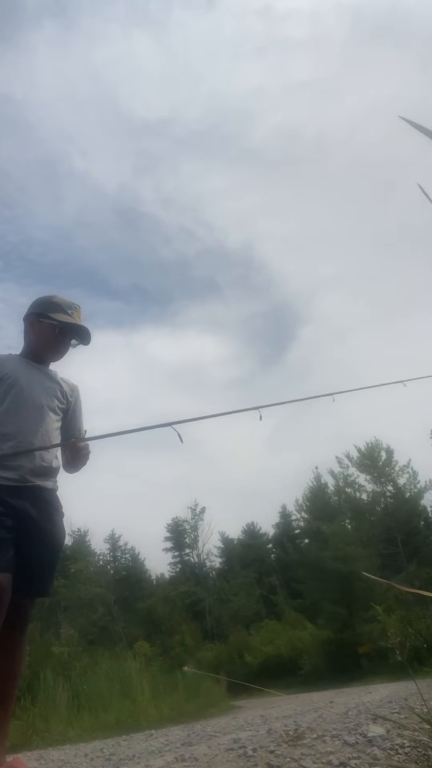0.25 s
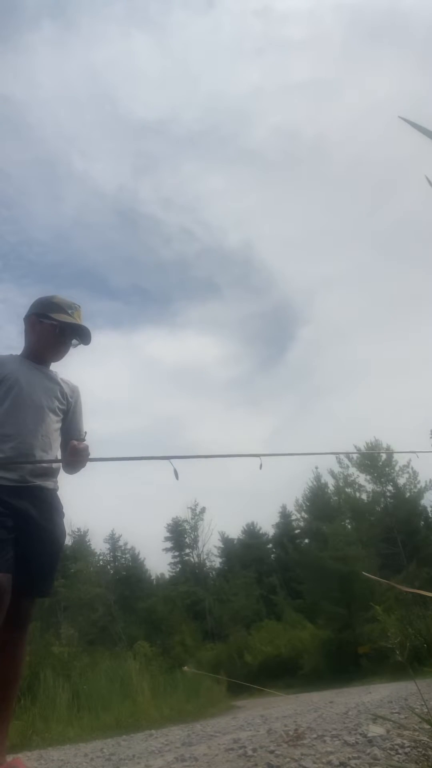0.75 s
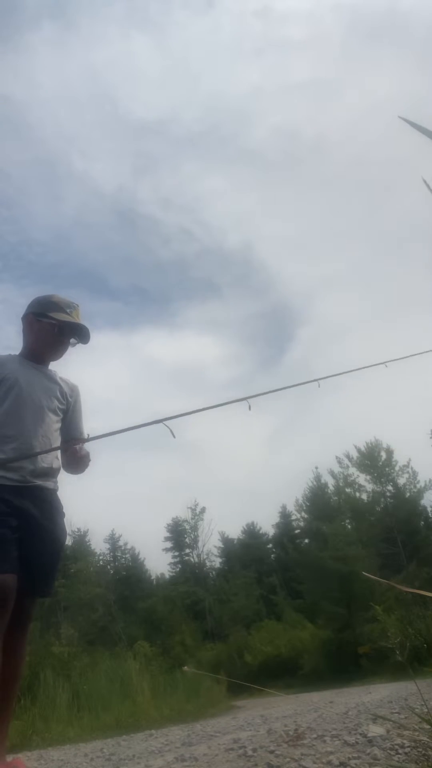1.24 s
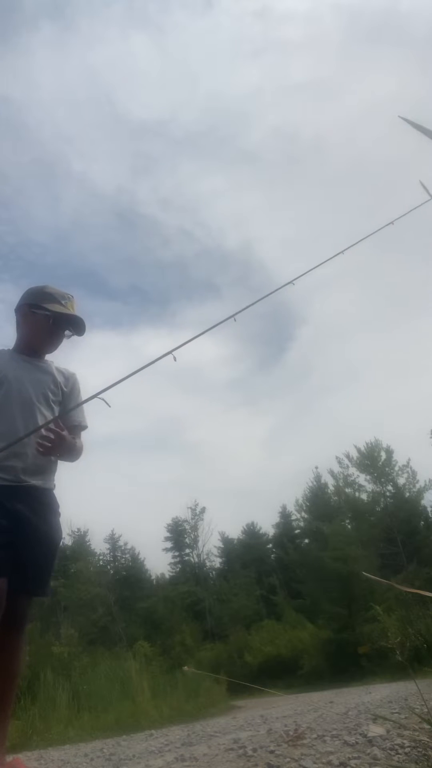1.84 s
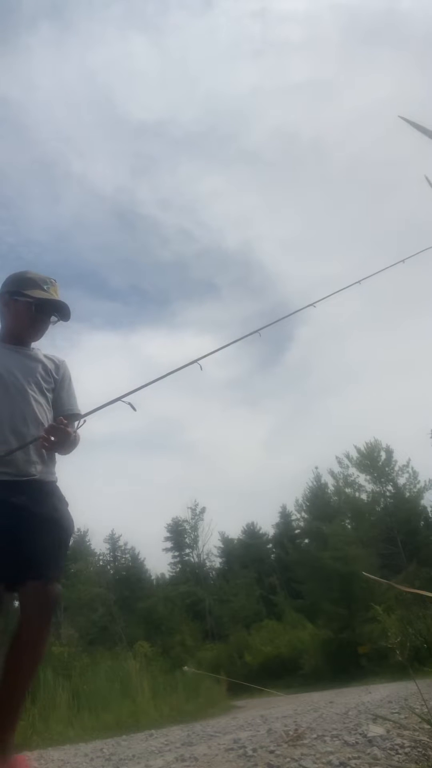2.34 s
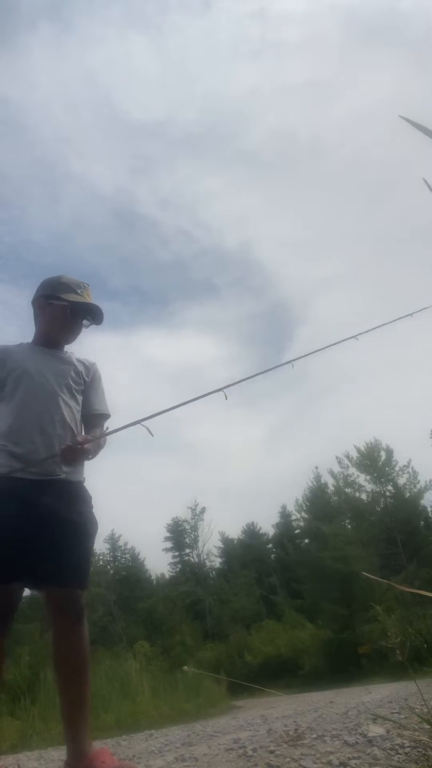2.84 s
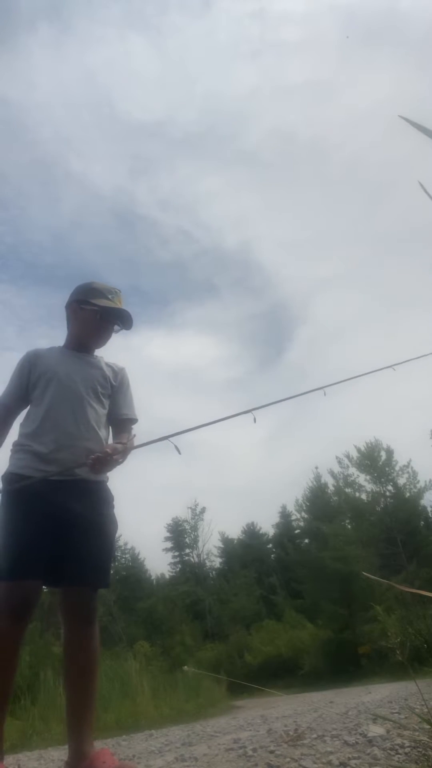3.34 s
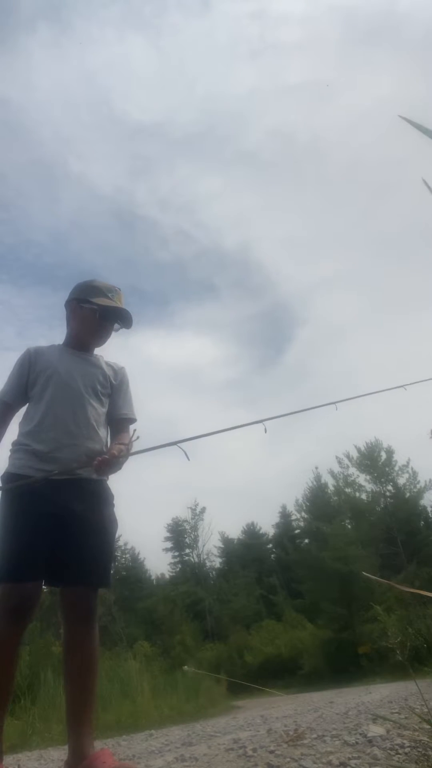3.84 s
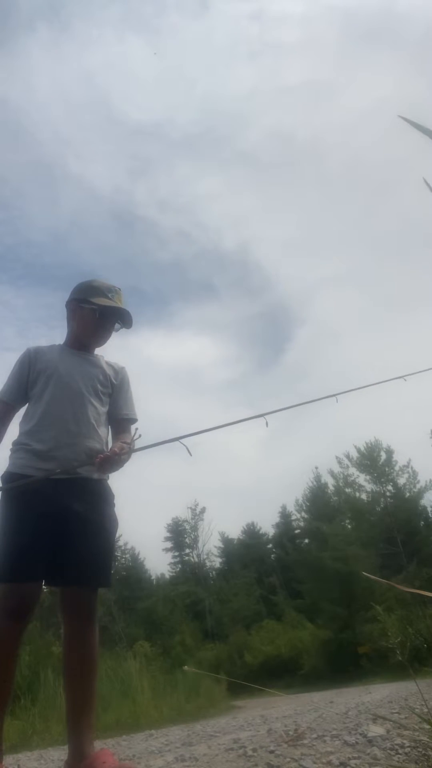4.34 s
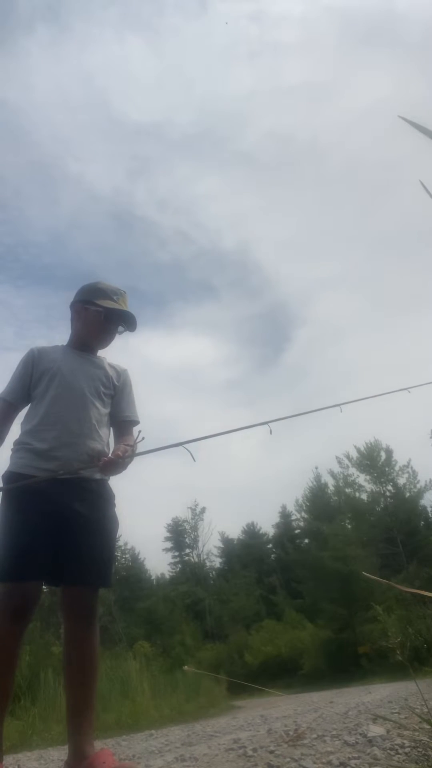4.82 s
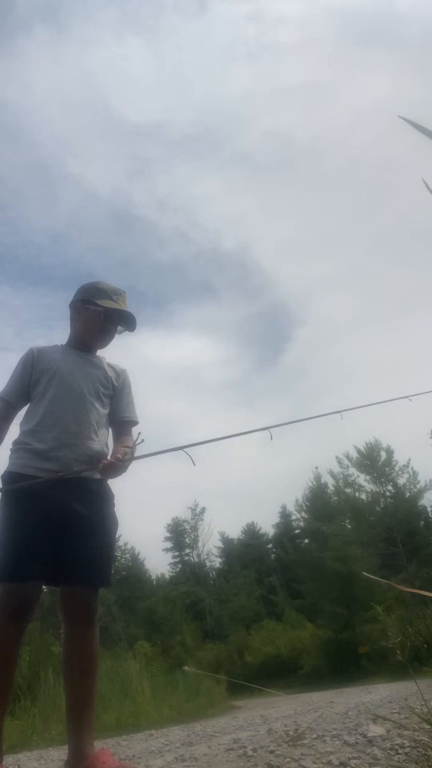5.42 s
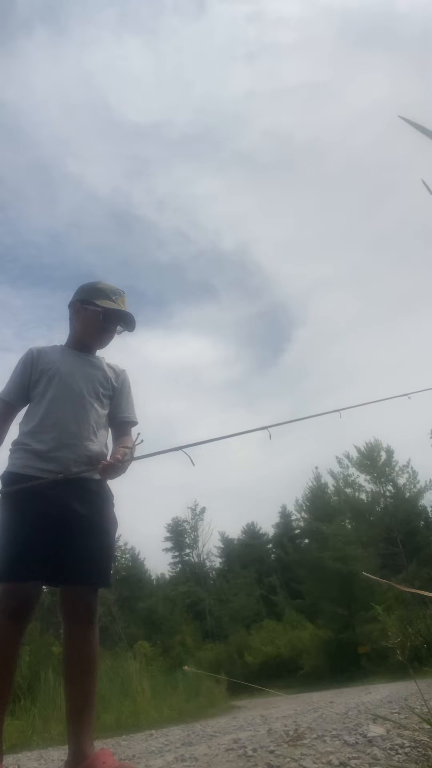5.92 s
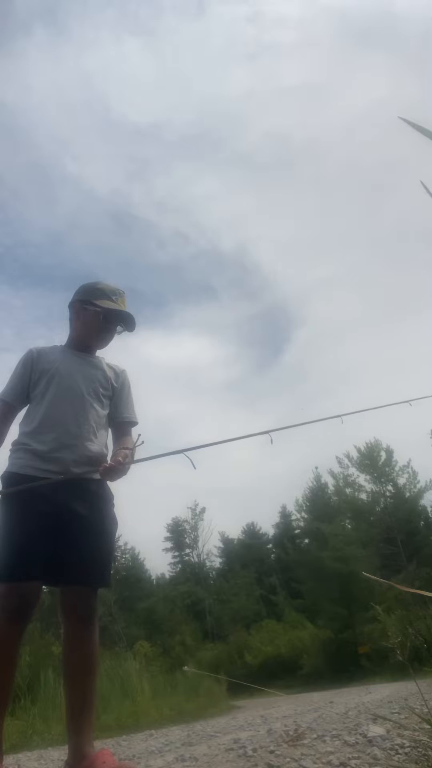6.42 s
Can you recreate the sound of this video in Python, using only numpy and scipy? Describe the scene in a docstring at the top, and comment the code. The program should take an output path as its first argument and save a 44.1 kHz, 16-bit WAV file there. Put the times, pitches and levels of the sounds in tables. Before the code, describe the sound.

A big engine's low throbbing drone revs up beyond the trees, dips in pitch at a gear change, then grows steadily until it passes nearest late on, over a slower chug and soft tyre roar. Close to the microphone, a reel bail snaps in a rapid metallic clatter around two seconds, followed by gravel scuffs and stone clicks. A frog plunks occasionally; a bird slurs down, then others chip and whistle. Open air, stereo, no speech.

```python
"""From the start an eight-cylinder engine revs and a slower one chugs: sums of exhaust orders, over
shaped noise for rumble, road, air and hiss, noisy hums and sine-burst ticks. A frog plunks now and then,
a short two-tone ring; chirps glide. During a gear change come knocks and a rasp of buzzing noise, and a
reel's bail starts snapping: noise cracks and ringing modes. Gravel grinds and clicks, as noise grains and
bursts. Birds slur, chip and whistle as gliding sines, and the big engine passes nearest."""
import sys
import numpy as np
from scipy import signal
from scipy.fft import rfft, irfft
from scipy.io import wavfile
from scipy.ndimage import uniform_filter1d, map_coordinates

SR = 44100
rng = np.random.default_rng(int(sys.argv[2]) if len(sys.argv) > 2 else 0)


def master_out(mix):
    """Clip the mix to full scale and print it as 16-bit PCM to the path in sys.argv[1]."""
    frames = np.transpose(np.atleast_2d(mix))
    ceiling = np.clip(frames, -1, 1)
    pcm = np.round(ceiling * 32767).astype(np.int16)
    wavfile.write(sys.argv[1], SR, pcm)


N = 294147
T = np.arange(N) / SR

# Noise spectra, relative density: pitch_hz, level_db
AIR_SPECTRUM = [(20, -30), (45, -9), (110, 6), (200, -7), (350, -1), (480, -6.5), (560, -10), (700, -9.5),
                (1100, -28.5), (1900, -44), (2350, -39.5), (3200, -40.5), (4200, -42), (5100, -43),
                (7800, -48), (12000, -55)]
HISS_SPECTRUM = [(1500, -39.5), (2050, -8), (2300, 0), (2600, -12), (3300, -28), (4200, -5.5),
                 (4900, -36.5)]
ROAR_SPECTRUM = [(100, -10), (350, 8), (530, -4), (660, -3), (880, 4.5), (1150, -7.5), (1350, -8.5),
                 (1650, -7), (2000, -19), (2400, -22.5), (3200, -40), (6000, -64)]
RUMBLE_SPECTRUM = [(20, -40.5), (32, -18), (42, -3), (60, -6.5), (93, 7), (115, -0.5), (140, -9),
                   (200, -20.5), (400, -32), (800, -71)]
GRAVEL_SPECTRUM = [(300, -5), (700, -1.5), (1400, 13), (1800, -3), (2200, 10), (3200, -14.5), (4200, -2),
                   (5500, -20.5), (8000, -8.5), (12000, -27)]
CRACK_SPECTRUM = [(200, -23), (900, -7.5), (2400, -5), (3300, -8), (4100, 2), (4900, -12), (6500, 2.5),
                  (8200, -4.5), (10000, -8.5), (11800, -16.5), (13000, -42)]
# Far sound, likeness of the two channels (used within 0-1): pitch_hz, likeness
LIKENESS = [(130, 1), (350, .96), (510, 0.15), (640, 1.1), (920, 0.3), (1120, 1.5), (1750, -0.06),
            (2200, 0.38), (3500, 0.13), (7500, 1.03), (11000, 0.9)]
# Far sound, phase lead of the right channel: pitch_hz, lead_rad
RIGHT_LEAD = [(220, 0), (330, -0.07), (470, -.2), (550, 1.33), (900, 1.8), (1050, 1.5), (1600, 0.53),
              (1900, 1.87), (2600, 1.9), (3300, 3.5), (4200, 4), (7000, 0.8), (12000, 2)]
# Far sound, left level over right: pitch_hz, level_db
LEFT_OVER_RIGHT = [(170, 0.2), (350, -1.5), (475, -6.5), (760, 6), (950, 3), (1200, -0.5), (1600, 2),
                   (2600, 0)]
# Hums from the far road, octave_db relative: start_s, length_s, pitch_hz, width_hz, level_db,
# octave_db, clean_share (0-1)
HUMS = [(-.5, 1.23, 341, 39, -59.5, -0.5, 0.07), (0.545, 0.49, 331, 34, -56, -14, 0),
        (1.562, 0.77, 319.7, 16, -57, -14.5, 0.32), (2.101, 1.01, 319.6, 7.4, -55.5, -11, 0.7),
        (5.852, 0.9, 285.4, 57, -53.5, -17, .1)]
# Runs of faint ticks: start_s, length_s
STUTTERS = [(.8, .04), (0.962, .06), (1.39, .1), (2.51, .06), (2.935, .04), (3.765, .06), (4.163, .085),
            (5.954, .06), (6.352, .06)]
# Drooping chirps deep in the wood: start_s, length_s, level_db, roughness (0-1)
CHIRPS = [(1.231, 0.25, -82, 0.5), (3.555, 0.069, -85, 0.6), (3.677, 0.075, -75, 0.1)]
# Hooked whistles, level before crest and pan: start_s, length_s, level_db, roughness (0-1),
# last_pitch_hz, glide_s
HOOKS = [(4.826, 0.12, -70.5, 0.75, 5600, 0.03), (4.949, 0.125, -67, .55, 5410, .019),
         (5.081, 0.11, -66, 0.18, 5470, .019)]
# One long falling slur: time_s, pitch_hz, level_db
SLUR = [(3.98, 3250, -88), (4.034, 2850, -60), (4.052, 2770, -71), (4.095, 2550, -55), (4.105, 2470, -59),
        (4.12, 2370, -51), (4.135, 2280, -56), (4.17, 2070, -59), (4.21, 1890, -64.5), (4.24, 1780, -77.5)]
# Chips softening into a twitter: centre_s, pitch_hz, peak_db, half_length_s, glide_octaves_per_s
CHIPS = [(4.823, 5150, -56, .0012, -3), (4.842, 4870, -45, .0011, -12), (4.862, 4980, -44, 0.00099, -9),
         (4.878, 4900, -41.5, .0011, -10.5), (4.897, 4770, -42, 0.00067, -9),
         (4.907, 5530, -58, .002, -4.5), (4.919, 4280, -61, 0.0017, 15), (4.927, 5520, -57.5, 0.0018, -14),
         (4.935, 3400, -70.5, .0015, 0.5), (4.948, 3400, -67, .0015, 2), (4.975, 3450, -66.5, .0015, 2.5),
         (4.94, 4130, -60, .002, -8.5), (4.946, 5170, -52.5, .002, -4), (4.958, 4110, -60.5, 0.003, 5.5),
         (4.9655, 5060, -51.5, 0.0017, -6.5), (4.978, 4360, -56.5, .003, 13.5),
         (4.986, 5370, -54.5, 0.0022, -4), (4.995, 3970, -64.5, 0.0031, 7.5),
         (5.006, 5250, -54.5, .003, -5), (5.014, 4210, -62.5, 0.0026, 16.5)]
# Rasping call, one row per voice: start_s, length_s, pitch_hz, half_width_hz, level_db
RASP = [(1.847, .152, 4100, 334, -65.5), (1.858, .13, 5050, 300, -68.5)]
# Frog plunks, level before envelope and pan: start_s, level_db
PLUNKS = [(.812, -44.5), (2.1422, -30), (3.298, -42.5), (5.765, -36.5)]
# Scuffs on gravel: start_s, length_s, level_db
SCUFFS = [(1.326, 0.24, -77), (2.246, 0.15, -71), (2.648, 0.17, -68.5), (2.764, 0.18, -75),
          (3.135, .05, -74), (3.275, 0.05, -73)]
# Stones clicking together: start_s, level_db, dullness_db_per_octave
STONES = [(2.289, -69.5, 0), (2.322, -70, -8), (2.6713, -61.5, -1), (2.713, -61, -3), (2.761, -62, 5),
          (2.812, -67.5, -6), (2.848, -66.5, -1), (2.9307, -64.5, 2.5), (3.144, -59.5, 6),
          (3.293, -60.5, 6), (3.836, -71.5, -14)]
# Light knocks on the rod: start_s, envelope_peak_db
KNOCKS = [(1.748, -55.5), (1.764, -52), (1.776, -52), (2.289, -47), (2.302, -48.5)]
# Bail strikes: start_s, crack_db, crack_t60_s, dullness_db_per_octave, body_db
BAIL = [(2.0408, -41, 0.029, -5, -43), (2.046, -50, 0.02, 9, -41.5), (2.059, -62, 0.03, 5, -58),
        (2.0732, -46.5, 0.038, 4, -56), (2.0805, -55, 0.028, 6, -48), (2.1096, -43, 0.023, 2, -50),
        (2.1150, -53, 0.035, 8, -42), (2.1275, -44.5, 0.038, 3.5, -65), (2.1422, -44.5, 0.062, 13, -44.5),
        (2.1525, -47, 0.024, 5, -48.5)]
# Modes of reel body and rod, before random detuning: pitch_hz, level_db, t60_s
REEL_MODES = [(650, 0, 0.057), (738, -2.5, 0.05), (1305, -3, 0.02), (1607, -14, 0.045), (2206, -9.5, 0.041),
              (2650, -9, 0.03)]
# Slow engine, its order groups: time_s, lower_orders_db, upper_orders_db
CHUG_LEVELS = [(0, -63, -65), (2.6, -64, -59.5), (3.7, -60.5, -71), (4.3, -56, -51), (5, -57, -55),
               (5.5, -58, -61.5), (6.1, -57.5, -54), (6.67, -54.5, -59.5)]
# Slow engine exhaust, relative: multiple_of_firing_rate, level_db
CHUG_ORDERS = [(2, -14), (3, 1.5), (4, -5.5), (6, -2.5), (7, -7), (9, -1), (10, -3), (11, -9), (12, -14.5),
               (14, -16), (15, -10.5), (16, -0.5), (17, -11.5), (23, -25.5)]
# Big engine exhaust, relative: multiple_of_eight_firing_cycle, level_db
DRONE_ORDERS = [(5, -18.5), (6, -21.5), (7, -22), (8, 1), (9, -17.5), (10, -25.5), (11, -26.5), (12, -31.5),
                (14, -27.5), (15, -31.5), (16, -26.5), (18, -37.5), (21, -42.5), (24, -42), (27, -35)]
# Brief swells and dips of the big engine: centre_s, half_length_s, change_db
SWINGS = [(2.796, 0.12, 2), (5.527, 0.24, 1.5), (3.807, 0.13, -1.5), (5.286, 0.059, -5), (5.942, .08, -3),
          (6.378, 0.14, -5.5)]

ROAR_DB, ROAR_NEAREST_AT_S, ROAR_PASS_S = -60, 5.95, 1.94
RUMBLE_START_DB, RUMBLE_DB_PER_S, RUMBLE_COAST_DB = -51, 1.32, -2.5
CHIRP_FROM_HZ, CHIRP_TO_HZ = 4550, 4300
HOOK_FROM_HZ, HOOK_CREST_DB, LEFT_BIRD_LEAD_MS = 7200, 7, 0.3185
WHISTLE_RISE_S, SLUR_ROUGHNESS = .008, .4
RASP_PER_S, RASP_DEPTH, RASP_RISE_S, RASP_FALL_S = 200, 0.47, 0.04, .015
PLUNK_HZ, PLUNK_FADE_S = 410, 0.015
KNOCK_HZ = 1273
CHUG_START_HZ, CHUG_SAG_HZ_PER_S, FIRST_UPPER_ORDER = 21.06, .168, 14
# Big engine: firing rates, gear change, throttle, pass
START_HZ, TOP_HZ, REV_S, START_DB = 83.22, 109.55, .36, -7.5
SHIFT_AT_S, SHIFT_S, HIGH_GEAR_HZ, GAIN_HZ_PER_S = 1.74, 0.3733, 98.96, 1.95
THROTTLE_AT_S, THROTTLE_S, COAST_DB = 2.22, 0.73, -6
NEAREST_AT_S, PASS_S, NEAREST_DB = 5.59, 2.67, -34
TREETOP_ECHO_T60_S = .26
CUT_HZ = 12300


def amp(db):
    """Amplitude from dB."""
    return 10 ** (np.asarray(db) / 20)


def unit(x):
    """Scales x to rms 1."""
    return x / np.sqrt(np.mean(x ** 2) + 1e-20)


def read(points, hz):
    """Reads a spectrum table on a log frequency scale."""
    f, value = np.transpose(points)
    return np.interp(np.log(hz + 1), np.log(f + 1), value)


def curves(rows):
    """Columns of a table, joined by straight lines over the whole time."""
    s, *columns = np.transpose(rows)
    return [np.interp(T, s, c) for c in columns]


def add(mix, start_s, sound):
    """Adds sound to mix in place, trimmed to fit."""
    start = round(start_s * SR)
    sound = sound[..., max(-start, 0):]
    part = mix[:, max(start, 0):][:, :sound.shape[-1]]
    part += sound[..., :part.shape[1]]


def wander(knots_per_s):
    """Smooth random curve of rms 1, held in steps of 100 samples."""
    knots = rng.standard_normal(400)
    curve = map_coordinates(knots, [T[::100] * knots_per_s], order=3, mode="wrap")
    return unit(curve)[np.arange(N) // 100]


def ease(start_s, length_s):
    """Smooth step from 0 to 1."""
    return np.sin(np.pi / 2 * np.clip((T - start_s) / length_s, 0, 1)) ** 2


def passing(at_s, pass_s):
    """Level in dB of a source moving along the road, 0 where nearest."""
    return -10 * np.log10(1 + ((T - at_s) / pass_s) ** 2)


def colour(x, spectrum, dull_db=0):
    """Filters x by a spectrum, tilted down dull_db per octave above 1 kHz, to rms 1."""
    hz = np.fft.rfftfreq(x.shape[-1], 1 / SR)
    gain_db = read(spectrum, hz) - dull_db * np.log2(np.maximum(hz, 1000))
    return unit(irfft(rfft(x) * amp(gain_db), x.shape[-1]))


def diffuse(spectrum):
    """Far noise at two microphones: one in the bass, partly alike and shifted in phase and level above."""
    left, other = rfft(rng.standard_normal((2, N)))
    hz = np.fft.rfftfreq(N, 1 / SR)
    same = np.clip(read(LIKENESS, hz), 0, 1)
    tilt = amp(read(LEFT_OVER_RIGHT, hz))
    right = same * left + np.sqrt(1 - same ** 2) * other
    right = right * np.exp(1j * read(RIGHT_LEAD, hz))
    pair = np.array([tilt * left, right]) / np.sqrt(1 + tilt ** 2)
    return colour(irfft(pair, N), spectrum)


def place(x, lead_ms):
    """Sound from one side reaches one microphone first: the left if lead_ms is positive."""
    hz = np.fft.rfftfreq(len(x), 1 / SR)
    delay = np.exp(-2j * np.pi * hz * lead_ms / 1000)
    return np.array([x, irfft(rfft(x) * delay, len(x))])


def forest(x, t60_s=0.14):
    """Trunks and leaves scatter a thin, short echo: sparse decaying random taps."""
    t = T[:SR // 2]
    sparse = rng.standard_normal((2, len(t))) * (rng.random((2, len(t))) < .05)
    taps = sparse * (t > .005) * amp(-60 * t / t60_s)
    return signal.fftconvolve(x, taps / np.linalg.norm(taps[0]), axes=1)[:, :N]


def air(level_db=-52.5):
    """Still air: steady diffuse noise."""
    return amp(level_db) * diffuse(AIR_SPECTRUM)


def hiss(level_db=-87, range_db=3):
    """Thin hiss that comes and goes at random."""
    return amp(level_db + range_db * wander(17)) * diffuse(HISS_SPECTRUM)


def ticks(level_db=-76, pitch_hz=7700, beat_s=.08, stutter_s=0.01):
    """Very faint sine bursts on a steady beat; some are skipped, a few stutter."""
    out, t = np.zeros((2, N)), np.arange(-2 ** 7, 2 ** 7) / SR
    tick = amp(level_db) * np.exp(-(t / .00035) ** 2 / 2) * np.sin(2 * np.pi * pitch_hz * t)
    beats = np.arange(0, T[-1], beat_s)
    times_s = [s for s, chance in zip(beats, rng.random(200)) if chance < .6]
    for start_s, length_s in STUTTERS:
        times_s.extend(np.arange(start_s, start_s + length_s, stutter_s))
    for s in times_s:
        add(out, s, tick)
    return out


def hums(waver_hz=1.5):
    """A hum and its octave swell and pass together, part wavering tone, part narrow noise."""
    out = np.zeros((2, N))
    for start_s, length_s, pitch_hz, width_hz, level_db, octave_db, clean in HUMS:
        size, clean = int(length_s * SR), np.clip(clean, 0, 1)
        turns = np.cumsum(pitch_hz + waver_hz * wander(4)[:size]) / SR
        for k, db in (1, level_db), (2, level_db + octave_db):
            hz = k * pitch_hz
            band = [(hz - 3 * width_hz, -70), (hz - width_hz, -16), (hz, 0),
                    (hz + width_hz, -16), (hz + 3 * width_hz, -70)]
            noise = unit(diffuse(band)[:, :size])
            lead_rad = np.array([[0], [read(RIGHT_LEAD, hz)]])
            tone = unit(np.sin(2 * np.pi * k * turns + lead_rad))
            hum = np.sqrt(clean) * tone + np.sqrt(1 - clean) * noise
            add(out, start_s, amp(db) * hum * signal.windows.tukey(size, .7))
    return out


def road_roar():
    """Tyre roar: flickering noise, loudest where the tyres pass nearest."""
    level_db = ROAR_DB + passing(ROAR_NEAREST_AT_S, ROAR_PASS_S) + 1.9 * wander(7)
    return amp(level_db) * diffuse(ROAR_SPECTRUM) * amp([[.8], [-.8]])


def exhaust_rumble():
    """Exhaust scattered by the forest: noise that grows as engines near, weaker until the throttle opens."""
    coast_db = RUMBLE_COAST_DB * (1 - ease(THROTTLE_AT_S, THROTTLE_S))
    return amp(RUMBLE_START_DB + RUMBLE_DB_PER_S * T + coast_db) * diffuse(RUMBLE_SPECTRUM)


def whistle(length_s, first_hz, last_hz, glide_s, rough, level_db, lead_ms, waver=0.0028, crest_db=0):
    """Down-gliding tone with a late crest; fast random flutter makes it hoarse, most at its start."""
    t = T[:int(length_s * SR)]
    glide_hz = last_hz + (first_hz - last_hz) * np.exp(-t / glide_s)
    hz = glide_hz * (1 + waver * wander(190)[:len(t)])
    crest = crest_db * np.exp(-((t / length_s - 0.66) / 0.19) ** 2)
    onset = 1 - np.exp(-t / WHISTLE_RISE_S)
    level = amp(level_db + crest - 3 * wander(70)[:len(t)]) * onset * np.sqrt(np.sin(np.pi * t / length_s))
    share = np.clip(rough * (1.5 - t / length_s), 0, 1)
    hoarse = unit(1 - share + share * wander(600)[:len(t)])
    tone = np.sin(2 * np.pi * np.cumsum(hz) / SR)
    return place(level * uniform_filter1d(hoarse, size=50) * tone, lead_ms)


def chirps():
    """Faint, slightly drooping whistles ahead."""
    out = np.zeros((2, N))
    for start_s, length_s, level_db, rough in CHIRPS:
        add(out, start_s, whistle(length_s, CHIRP_FROM_HZ, CHIRP_TO_HZ, glide_s=0.086, rough=rough,
                                  level_db=level_db, lead_ms=0, waver=0.019))
    return out


def hooks():
    """High whistles on the left: each drops fast, levels out and then crests."""
    out = np.zeros((2, N))
    for start_s, length_s, level_db, rough, last_hz, glide_s in HOOKS:
        hook = whistle(length_s, HOOK_FROM_HZ, last_hz, glide_s, rough, level_db, LEFT_BIRD_LEAD_MS,
                       crest_db=HOOK_CREST_DB)
        add(out, start_s, hook * amp([[1.2], [-1.2]]))
    return out


def slur(lead_ms=-0.12):
    """A bird on the right slides down, its voice shaking in strength and phase."""
    hz, level_db = curves(SLUR)
    singing = (T > SLUR[0][0]) & (T < SLUR[-1][0])
    shake = SLUR_ROUGHNESS * uniform_filter1d(wander(420), size=100)
    jitter_rad = SLUR_ROUGHNESS * uniform_filter1d(wander(420), size=100)
    tone = np.sin(2 * np.pi * np.cumsum(hz) / SR + jitter_rad)
    return place(singing * amp(level_db) * (1 + shake) * tone, lead_ms)


def chips(skirt=.11, skirt_s=.003):
    """Tiny gliding notes on the left, each a clear peak in a ragged skirt."""
    out, t = np.zeros((2, N)), np.arange(-2 ** 10, 2 ** 10) / SR
    for centre_s, hz, peak_db, half_s, glide in CHIPS:
        ragged = unit(uniform_filter1d(rng.standard_normal(len(t)), size=30))
        shape = np.exp(-(t / half_s) ** 2 / 2) + skirt * ragged * np.exp(-(t / skirt_s) ** 2 / 2)
        tone = np.sin(2 * np.pi * np.cumsum(hz * 2 ** (glide * t)) / SR)
        chip = amp(peak_db) * uniform_filter1d(shape, size=12) * tone
        add(out, centre_s + t[0], place(chip, LEFT_BIRD_LEAD_MS))
    return out


def rasp(edge_db=-8, skirt_db=-38):
    """Hoarse buzz in two voices: pulsed band noise that fades in and stops quickly."""
    out = np.zeros((2, N))
    for start_s, length_s, hz, half_hz, level_db in RASP:
        t = T[:int(length_s * SR)]
        band = [(hz - 4 * half_hz, -70), (hz - 2 * half_hz, skirt_db), (hz - half_hz, edge_db), (hz, 0),
                (hz + half_hz, edge_db), (hz + 2 * half_hz, skirt_db), (hz + 4 * half_hz, -70)]
        buzz = 1 + RASP_DEPTH * np.sin(2 * np.pi * RASP_PER_S * t + wander(60)[:len(t)])
        voice = unit(buzz * colour(rng.standard_normal(len(t)), band))
        fades = np.minimum(t / RASP_RISE_S, 1) * np.minimum((length_s - t) / RASP_FALL_S, 1)
        add(out, start_s, place(amp(level_db) * fades * voice, LEFT_BIRD_LEAD_MS))
    return out


def frog(overtone_db=-14, overtone=1.55):
    """One pluck of the throat rings the vocal sac at two pitches."""
    out, t = np.zeros((2, N)), np.arange(2 ** 13) / SR
    sac = np.sin(2 * np.pi * PLUNK_HZ * t)
    sac = sac + amp(overtone_db) * np.sin(2 * np.pi * overtone * PLUNK_HZ * t)
    pluck = sac * t / PLUNK_FADE_S * np.exp(-(t / PLUNK_FADE_S) ** 2 / 2)
    for start_s, level_db in PLUNKS:
        add(out, start_s, amp(level_db) * pluck)
    return out * amp([[-1.5], [1.5]])


def gravel_scuffs(grains_per_s=1100, spread_db=1.5):
    """Small stones grind under a foot: random grains of uneven size."""
    sizes = amp(spread_db * np.minimum(rng.exponential(1, N), 4))
    grains = sizes * (rng.random(N) < grains_per_s / SR)
    grit = colour(grains * rng.standard_normal((2, N)), GRAVEL_SPECTRUM)
    level = np.zeros((2, N))
    for start_s, length_s, level_db in SCUFFS:
        add(level, start_s, amp(level_db) * signal.windows.tukey(int(length_s * SR), .6))
    return level * grit


def stone_clicks(t60_s=0.032):
    """Single stones click together: short decaying noise bursts."""
    out, t = np.zeros((2, N)), np.arange(2 ** 11) / SR
    for start_s, level_db, dull_db in STONES:
        noise = colour(rng.standard_normal((2, len(t))), GRAVEL_SPECTRUM, dull_db)
        add(out, start_s, noise * amp(level_db - 60 * t / t60_s))
    return out


def rod_knocks(fade_s=0.0014):
    """Knocks on the rod: a tone that dies within a few cycles."""
    out, t = np.zeros((2, N)), np.arange(2 ** 13) / SR
    for start_s, peak_db in KNOCKS:
        envelope = amp(peak_db) * t / fade_s * np.exp(1 - t / fade_s)
        add(out, start_s, place(envelope * np.sin(2 * np.pi * KNOCK_HZ * t), lead_ms=-0.11))
    return out


def reel_bail(shared=0.25, rise_s=0.00086, detune=0.042, uneven_db=2):
    """Each bail strike is a short noise crack and rings the reel's modes a little differently."""
    out, t = np.zeros((2, N)), np.arange(2 ** 13) / SR
    for start_s, crack_db, t60_s, dull_db, body_db in BAIL:
        noise = shared * rng.standard_normal(len(t)) + rng.standard_normal((2, len(t)))
        sound = colour(noise, CRACK_SPECTRUM, dull_db) * amp(crack_db - 60 * t / t60_s)
        chances = rng.uniform(-0.9, 1, (len(REEL_MODES), 2))
        for (hz, mode_db, ring_s), (sharp, loud) in zip(REEL_MODES, chances):
            turns = hz * (1 + detune * sharp) * t + rng.random((2, 1)) / 2
            level = amp(body_db + mode_db + uneven_db * loud - 60 * t / ring_s)
            sound = sound + level * np.sin(2 * np.pi * turns)
        add(out, start_s, sound * (1 - np.exp(-t / rise_s)))
    return out


def exhaust(cycle_hz, orders, steady_order, smear_rad, fade_db, drift_rad):
    """Exhaust orders: the pipe smears each beat; moving air makes orders off the steady one fade and drift."""
    turns, out = np.cumsum(cycle_hz) / SR, np.zeros(N)
    for k, level_db in orders:
        away = round(k) - steady_order
        loose = min(abs(away) / 3, 1)
        drift = drift_rad * loose * wander(2.5)
        phase = 2 * np.pi * round(k) * turns + smear_rad * away ** 2 + drift
        out += amp(level_db + fade_db * loose * wander(2.5)) * np.sqrt(2) * np.cos(phase)
    return out


def slow_engine():
    """Chug that sags in rate; lower orders grow as it nears, upper orders swell and fade."""
    lower_db, upper_db = curves(CHUG_LEVELS)
    orders = []
    for k, db in CHUG_ORDERS:
        group_db = upper_db if round(k) >= FIRST_UPPER_ORDER else lower_db
        orders.append((k, db + group_db))
    firing_hz = CHUG_START_HZ - CHUG_SAG_HZ_PER_S * T
    chug = exhaust(firing_hz, orders, steady_order=16, smear_rad=.9, fade_db=4.0, drift_rad=0.32)
    return chug * amp([[-.8], [.8]])


def drive():
    """Firing rate in Hz and level in dB of the big engine, from its gear, throttle and distance."""
    lagging = np.exp(-(T / REV_S) ** 2)
    low_gear_hz = TOP_HZ + (START_HZ - TOP_HZ) * lagging
    high_gear_hz = HIGH_GEAR_HZ + GAIN_HZ_PER_S * (T - SHIFT_AT_S)
    firing_hz = low_gear_hz + (high_gear_hz - low_gear_hz) * ease(SHIFT_AT_S, SHIFT_S)
    throttle_db = START_DB * lagging + COAST_DB * (1 - ease(THROTTLE_AT_S, THROTTLE_S))
    swings_db = sum(db * np.exp(-((T - s) / half_s) ** 2) for s, half_s, db in SWINGS)
    return firing_hz, NEAREST_DB + passing(NEAREST_AT_S, PASS_S) + throttle_db + swings_db


def big_engine():
    """Eight uneven cylinders: orders of the whole cycle make the drone throb once a cycle."""
    firing_hz, level_db = drive()
    drone = exhaust(firing_hz / 8, DRONE_ORDERS, steady_order=8, smear_rad=.35, fade_db=1.0, drift_rad=0.74)
    return amp(level_db) * drone * amp([[.3], [-.3]])


def scene():
    """Engines and road far off, birds in the trees, reel and gravel close by."""
    background = air() + hiss() + ticks() + hums() + road_roar() + exhaust_rumble()
    song = chirps() + hooks() + slur() + chips() + rasp()
    plunks = frog()
    near = gravel_scuffs() + stone_clicks() + rod_knocks() + reel_bail()
    echo = forest(amp(-8) * near + amp(-13) * plunks)
    echo = echo + forest(amp(-11.5) * song, t60_s=TREETOP_ECHO_T60_S)
    return background + song + plunks + near + echo + slow_engine() + big_engine()


def record(dry):
    """Band limit: low-pass at CUT_HZ."""
    lowpass = signal.firwin(401, CUT_HZ, window=("kaiser", 8), fs=SR)
    return signal.oaconvolve(dry, lowpass[None], "same")


dry = scene()
out = record(dry)
master_out(out)
```